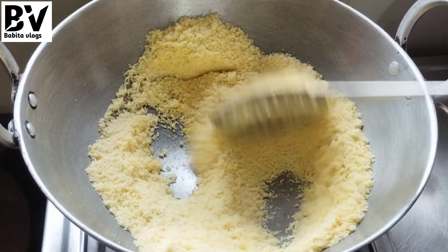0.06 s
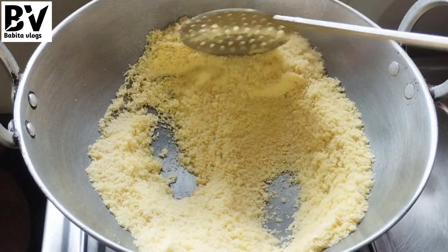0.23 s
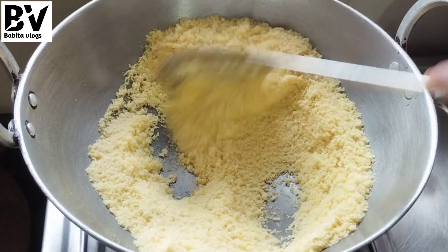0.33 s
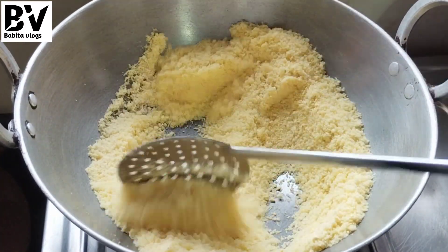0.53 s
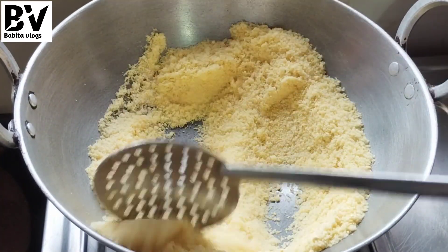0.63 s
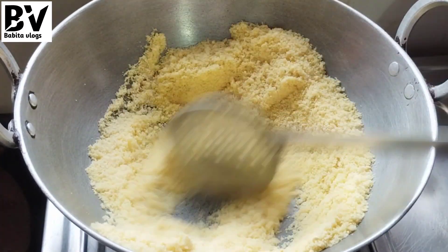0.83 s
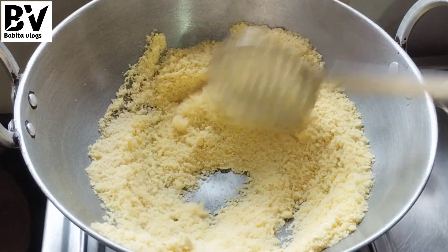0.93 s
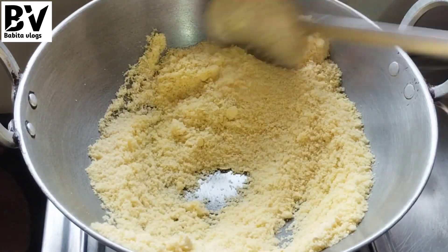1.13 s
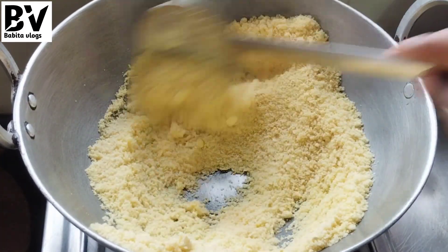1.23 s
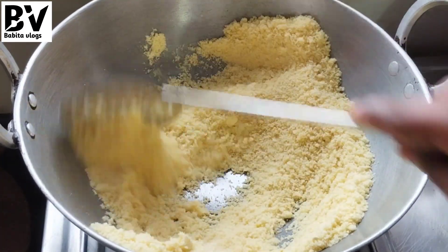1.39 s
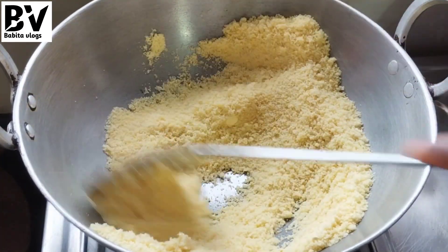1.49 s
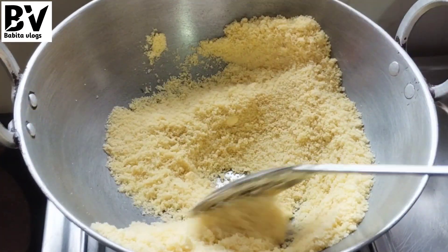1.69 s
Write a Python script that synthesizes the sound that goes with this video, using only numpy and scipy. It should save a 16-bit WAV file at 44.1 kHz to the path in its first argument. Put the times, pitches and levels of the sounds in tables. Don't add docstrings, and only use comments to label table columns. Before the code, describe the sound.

A metal ladle lands in a pan with a loud knock and bounce, grinds dry grains in gritty scrapes, then makes three quieter strokes; faint gas flame hiss, small kitchen, close microphone.

```python
import sys
import numpy as np
from scipy import signal
from scipy.fft import rfft, irfft, next_fast_len
from scipy.io import wavfile

SR = 44100
rng = np.random.default_rng(int(sys.argv[2]) if len(sys.argv) > 2 else 0)


def store_pcm(level_fs):
    pcm = np.round(np.clip(level_fs, -1, 1) * 32767).astype(np.int16)
    wavfile.write(sys.argv[1], SR, np.atleast_2d(pcm).T)


def makeup_ratio(level_db):
    decades = np.asarray(level_db, float) / 20
    return 10 ** decades


N = 77175

# (frequency [Hz], width [Hz], level [dB])
LADLE_MODES = [(3740, 60, -9.5), (4565, 96, -12), (5400, 53, -2.5), (5666, 10, -4), (6100, 27, -10),
               (6520, 69, -2), (7160, 77, 1), (7490, 97, 0.5), (8160, 450, 0.5), (8600, 90, -2.5),
               (8570, 27, 5), (9273, 87, 3.5), (9540, 100, -1), (10150, 31, -8)]


def rms_one(x):
    return x / np.sqrt(np.mean(x ** 2) + 1e-20)


def drift(rate_hz):
    step = 40
    settle = 2000
    r = np.exp(-2 * step * np.pi * rate_hz / SR)
    white = rng.standard_normal(N // step + settle + 2)
    slow = signal.lfilter([1], [1, -2 * r, r * r], white)[settle:]
    return np.interp(np.arange(N) / step, np.arange(len(slow)), rms_one(slow))


def ring(x, hz, width_hz):
    r = np.exp(-np.pi * width_hz / SR)
    w = 2 * np.pi * hz / SR
    return signal.lfilter([0, np.sin(w)], [1, -2 * r * np.cos(w), r * r], x + 1e-18)


def body(x, modes, patchy_db):
    out = np.zeros(N)
    for k, (hz, width_hz, db) in enumerate(modes):
        gain = (-1) ** k * makeup_ratio(db) * np.sqrt(width_hz * np.log(10)) / 10
        out += gain * ring(x * makeup_ratio(patchy_db * drift(8)), hz, width_hz)
    return out


def colour(x, points, patchy_db):
    hz, db = np.transpose(points)
    edges_hz = np.geomspace(hz[0], hz[-1], int(3 * np.log2(hz[-1] / hz[0])) + 1)
    out = np.zeros(N)
    for k, (low, high) in enumerate(zip(edges_hz, edges_hz[1:])):
        band_db = np.interp(np.log(low * high) / 2, np.log(hz), db)
        sos = signal.butter(2, [low, high], "band", fs=SR, output="sos")
        out += (-1) ** k * makeup_ratio(band_db + patchy_db * drift(13.3)) * signal.sosfilt(sos, x)
    return out


def gas_flame():
    # (frequency [Hz], level [dB per Hz])
    rumble_spectrum = [(12, -49), (20, -15), (60, -3.5), (151, -21.5), (380, -20.5), (447, -24.5),
                       (489, -20), (536, -19), (1500, -33.5), (1950, -72), (3300, -120)]
    hiss_spectrum = [(880, -22), (1500, 7.5), (1720, -19.5), (1810, -2.5), (2410, -5.5), (5070, -9),
                     (7390, -2.5), (8830, 1.5), (16000, -21)]
    rumble = rms_one(colour(rng.standard_normal(N), rumble_spectrum, 2.6))
    hiss = rms_one(colour(rng.standard_normal(N), hiss_spectrum, 1.0))
    return makeup_ratio(-49) * rumble + makeup_ratio(-51.5) * hiss


def knocks():
    # (time [s], peak level [dB], clink level [dB], contact length [s])
    hits = [
        (0.242, -4.5, -1, 0.0083),
        (0.2562, -13.5, -12, 0.0024),
        (0.7383, -29, 2.5, 0.012),
        (.748, -30.5, -2, 0.0065),
        (1.0945, -26.5, -4.5, 0.011),
        (1.319, -29.5, -11, .005),
    ]
    # (frequency [Hz], width [Hz], level [dB])
    thud_modes = [(253, 48, -4.5), (401.3, 38, -0.5), (520, 31, -7), (650, 36, -0.5), (800, 44, -4),
                  (952, 96, -5), (1212, 107, -0.5), (1644, 77, -12.5), (2025, 110, -16.5)]
    # (frequency [Hz], level [dB per Hz])
    clink_spectrum = [(880, -13), (1500, -3.5), (2830, -31.5), (3520, -14), (4200, -5.5), (5440, -2.5),
                      (7100, -3.5), (9470, -5), (16000, -29)]
    clink_t60_s, ladle_ring, first_tap = 0.087, 0.53, 1.26
    out, t = np.zeros(N), np.arange(N) / SR
    for start_s, peak_db, clink_db, contact_s in hits:
        since_s = np.maximum(t - start_s, 0)
        touching = (t >= start_s) * np.exp(-since_s / contact_s)
        force = rng.standard_normal(N) * touching / np.sqrt(contact_s * SR)
        force[int(start_s * SR)] -= first_tap
        out += makeup_ratio(peak_db - 9) * body(force, thud_modes, 1)

        white = rng.standard_normal(N)
        clink = rms_one(colour(white, clink_spectrum, 0.5))
        clink += ladle_ring * rms_one(body(white, LADLE_MODES, 2.5))
        decay = (t >= start_s) * makeup_ratio(-60 * since_s / clink_t60_s)
        out += makeup_ratio(peak_db + clink_db - 3) * clink * decay
    return out


def scraping():
    # (time [s], grinding level [dB], weight on the pan [dB])
    strokes = [
        [(0.262, -22, 3), (0.272, -24, -2), (0.29, -25.5, -3.5), (0.31, -18.5, -4.5), (0.33, -31.5, -0.5),
         (0.346, -20, -9.5), (0.39, -37, -1.5), (0.53, -59, 5), (0.54, -55, 7.5)],
        [(0.63, -64, 16), (0.644, -50.5, 0.5), (0.73, -46, -13.5), (0.736, -39, 2), (0.746, -27, -4),
         (0.768, -39, -8), (0.918, -63.5, -1), (0.928, -61, -23), (0.94, -69, -14)],
        [(1.093, -27.5, -5), (1.099, -25.5, -5.5), (1.119, -26, -9), (1.151, -20, -24.5), (1.225, -20.5, -15),
         (1.265, -24.5, -12.5), (1.3, -40, -2.5)],
        [(1.302, -51, 5), (1.31, -24, -12), (1.33, -22.5, -11.5), (1.376, -43.5, -6.5), (1.612, -55.5, 7),
         (1.626, -58, 6.5), (1.69, -66.5, 18.5), (1.732, -49, -13), (1.75, -65, 2)],
    ]
    bare_shares = [0.25, 0.17, 0.83, 0.27]
    # (frequency [Hz], level [dB per Hz])
    grain_spectrum = [(880, -26), (1500, -15), (2970, -21), (3480, -14), (5170, -6), (6310, -3),
                      (8490, 2.5), (9950, -15), (16000, -20)]
    # (frequency [Hz], width [Hz], level [dB])
    handle_modes = [(1203, 76, -9), (1330, 52, -16), (1686, 25, -14.5), (2420, 80, -19), (2570, 91, -22),
                    (3130, 68, -23.5), (11550, 54, -9), (12900, 80, -18), (14700, 150, -14)]
    pan_modes = [(103.5, 57, -10.5), (204, 32, -11), (270, 42, -1), (402, 23, 0), (487.5, 36, -4),
                 (615, 46, -0.5), (718, 52, -3.5), (797, 130, -3.5), (1013, 80, -4.5), (1213, 127, -6),
                 (1640, 190, -15), (2290, 170, -20.5)]
    lifted_db, land_s = -64.5, 0.0042
    grains_per_s, grain_spread_db = 6000, 3.5
    grind_patch_db, sing_patch_db = 2, 3

    rows = []
    for stroke, share in zip(strokes, bare_shares):
        first, last = stroke[0], stroke[-1]
        landing = (first[0] - land_s, lifted_db, first[2])
        lifting = (last[0] + land_s / 6, lifted_db, last[2])
        rows += [(*row, share) for row in [landing, *stroke, lifting]]
    time_s, *columns = np.transpose(rows)
    level_db, weight_db, bare = [np.interp(np.arange(N) / SR, time_s, c) for c in columns]

    size_db = grain_spread_db * np.minimum(rng.exponential(1, (3, N)), 4)
    sizes = makeup_ratio(size_db) * rng.choice([-1, 1], (3, N))
    loose, edge, load = sizes * (rng.random((3, N)) < grains_per_s / SR)
    hiss = rms_one(colour(loose, grain_spectrum, grind_patch_db))
    sing = rms_one(body(edge, LADLE_MODES + handle_modes, sing_patch_db))
    pan = rms_one(body(load, pan_modes, sing_patch_db))
    return makeup_ratio(level_db) * (np.sqrt(1 - bare) * hiss + bare * sing + makeup_ratio(weight_db) * pan)


def pan_rocking():
    # (time [s], peak level [dB])
    rocks = [
        (0.561, -30.5),
        (0.595, -35),
        (0.625, -40),
        (0.653, -36.5),
    ]
    # (frequency [Hz], level [dB], t60 [s])
    rock_modes = [(599, 1, 0.098), (427, -8.5, 0.21), (516, -6, 0.092), (2350, -12, .04)]
    out = np.zeros(N)
    time_s, peak_db = np.transpose(rocks)
    for hz, mode_db, t60_s in rock_modes:
        taps = np.zeros(N)
        scatter_db = rng.normal(0, 1.2, len(time_s))
        taps[(time_s * SR).astype(int)] = makeup_ratio(peak_db + mode_db - 3 + scatter_db)
        soft_taps = np.convolve(taps, np.hanning(9) / 4)[:N]
        out += ring(soft_taps, hz, np.log(1000) / np.pi / t60_s)
    return out


def stove_hum():
    start_s, rise_s, fall_s, hz = 0.772, 0.04, 0.056, 57.5
    since_s = np.maximum(np.arange(N) / SR - start_s, 0)
    rise = 1 - np.exp(-(since_s / rise_s) ** 2)
    fall = np.exp(-np.maximum(since_s - rise_s, 0) / fall_s)
    return makeup_ratio(-31) * rise * fall * np.sin(2 * np.pi * hz * since_s)


def grain_pop():
    # (time [s], peak level [dB])
    pops = [
        (1.629, -25.5),
    ]
    out = np.zeros(N)
    for time_s, peak_db in pops:
        click = np.zeros(N)
        click[int(time_s * SR)] = makeup_ratio(peak_db)
        out += ring(click, 8300, 2500) + 0.56 * ring(click, 3200, 2500)
    return out


def kitchen(x):
    t60_s, wall_cut_hz = 0.35, 4900
    size = next_fast_len(2 * N)
    w = 2 * np.pi * np.arange(size // 2 + 1) / size
    dull = 1 / (1 + 1j * w * SR / (2 * np.pi * wall_cut_hz * 4))
    response = 0
    for k, lag_s in enumerate(rng.uniform(0.009, 0.035, 10)):
        loop = makeup_ratio(-60 * lag_s / t60_s) * dull * np.exp(-1j * w * lag_s * SR)
        response = response + (-1) ** k * loop / (1 - loop)
    return irfft(rfft(x, size) * response, size)[:N]


def scene():
    flame = gas_flame()
    pan = knocks() + scraping() + pan_rocking() + stove_hum() + grain_pop()
    return (flame + pan + makeup_ratio(-19) * kitchen(pan))[None]


def roll_off(x):
    return signal.sosfilt(signal.butter(12, 16830, fs=SR, output="sos"), x)


def record(dry):
    overload, cutoff_hz = 0.97, 15950
    rounded = overload * np.tanh(dry / overload)
    low_pass = signal.cheby2(14, 50, cutoff_hz, fs=SR, output="sos")
    return roll_off(0.99 * signal.sosfilt(low_pass, rounded))


dry = scene()
out = record(dry)
store_pcm(out)
```